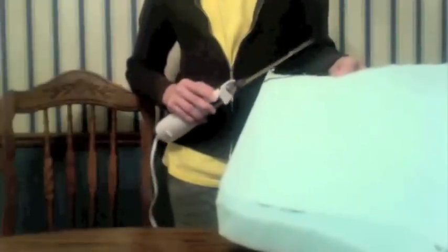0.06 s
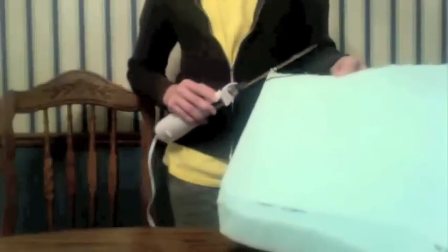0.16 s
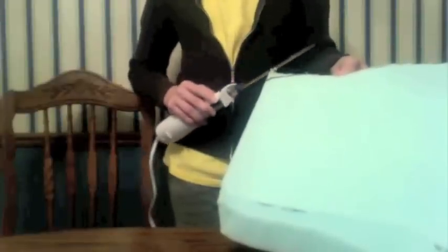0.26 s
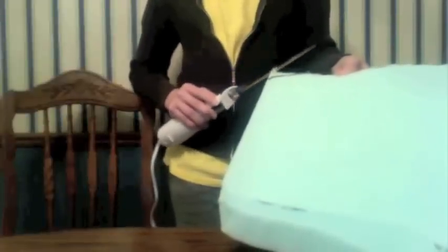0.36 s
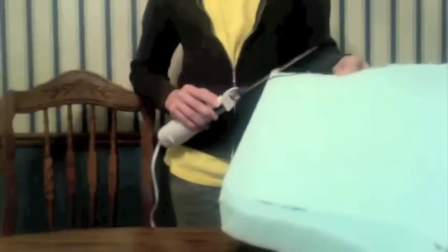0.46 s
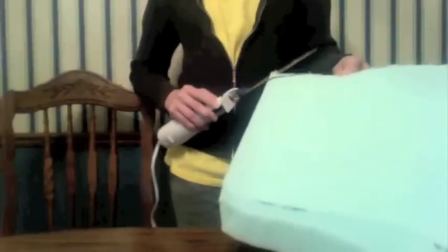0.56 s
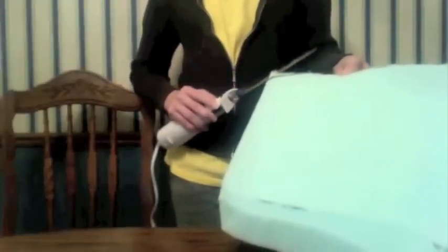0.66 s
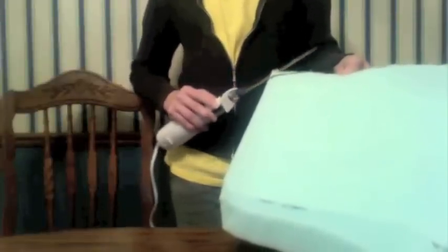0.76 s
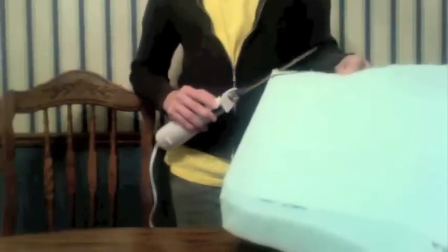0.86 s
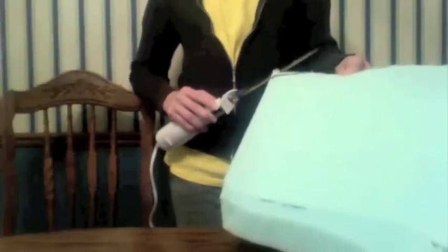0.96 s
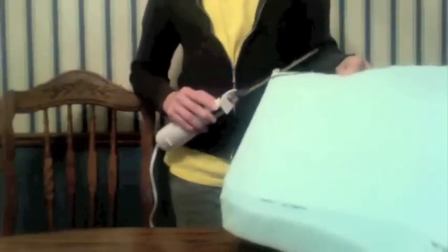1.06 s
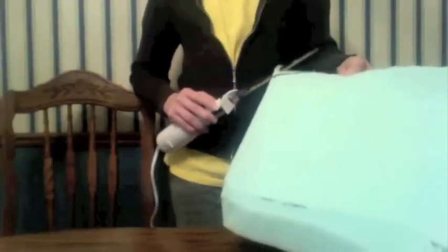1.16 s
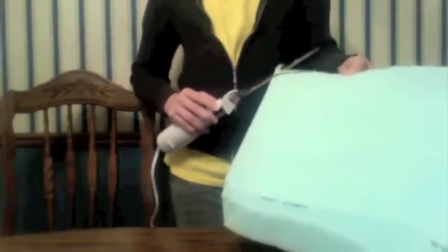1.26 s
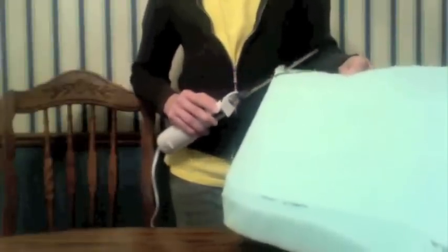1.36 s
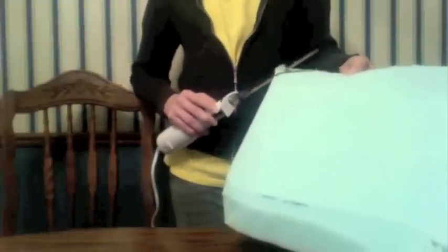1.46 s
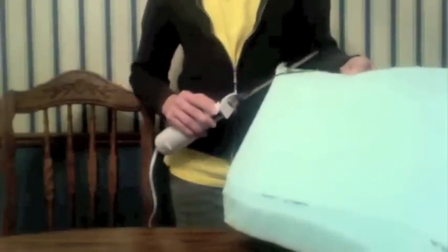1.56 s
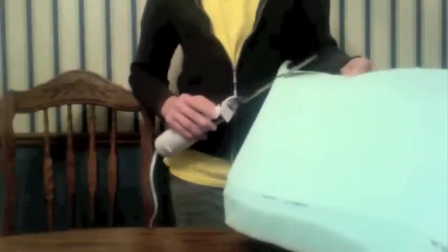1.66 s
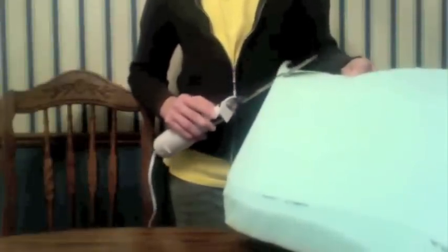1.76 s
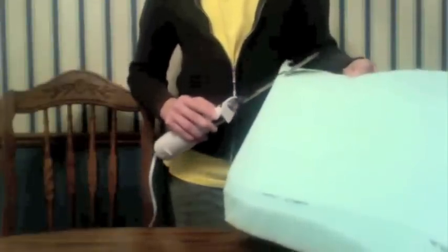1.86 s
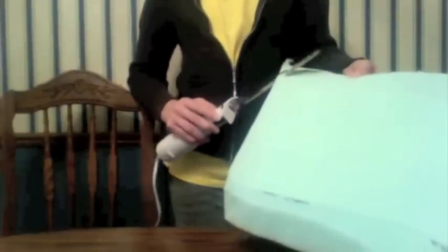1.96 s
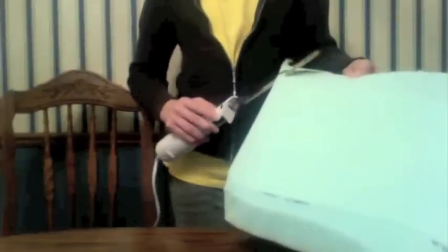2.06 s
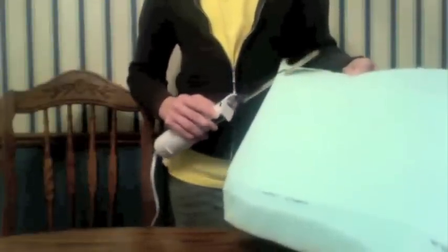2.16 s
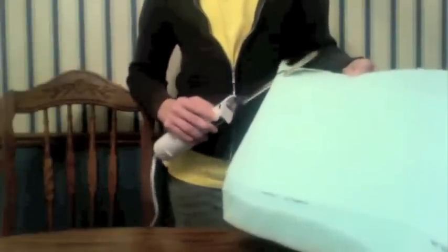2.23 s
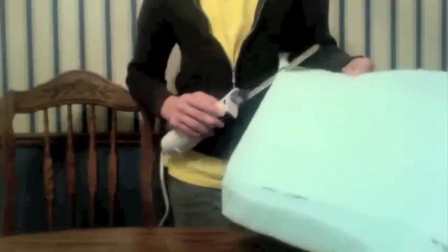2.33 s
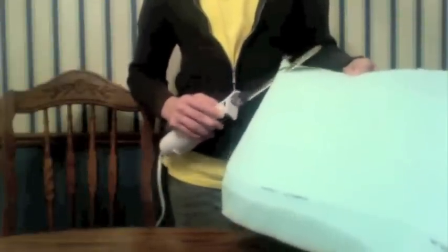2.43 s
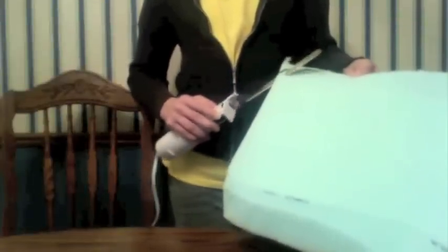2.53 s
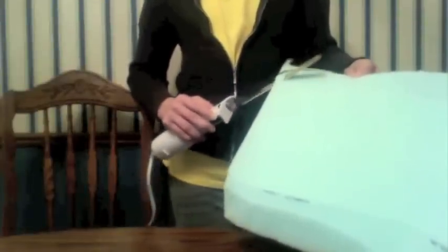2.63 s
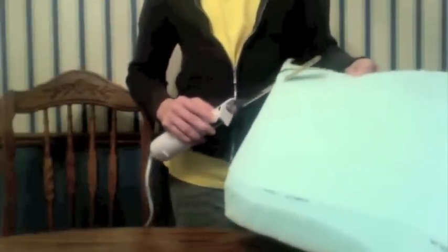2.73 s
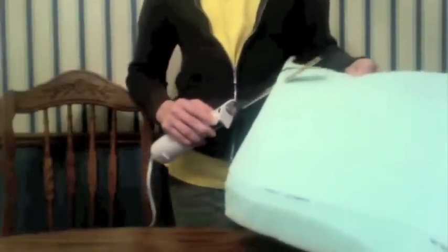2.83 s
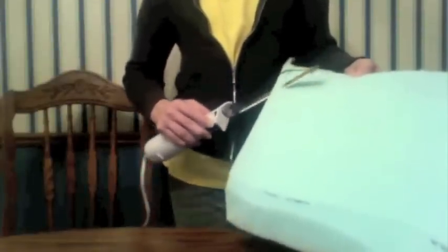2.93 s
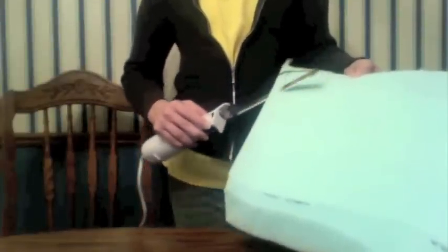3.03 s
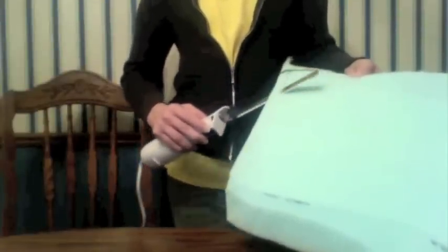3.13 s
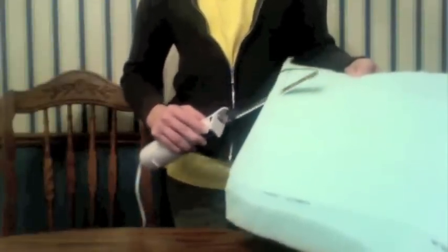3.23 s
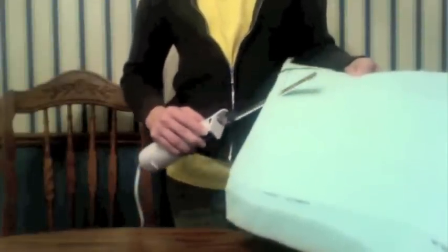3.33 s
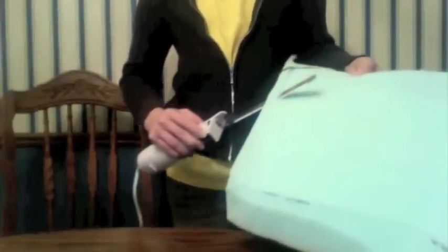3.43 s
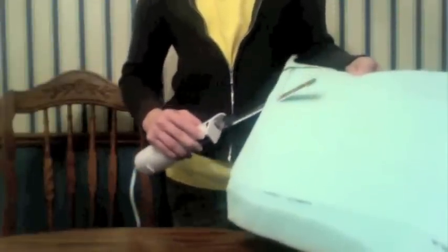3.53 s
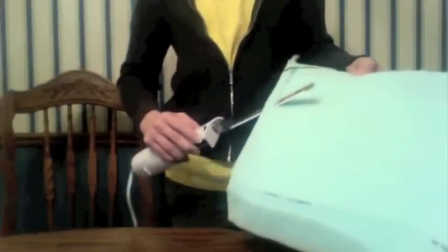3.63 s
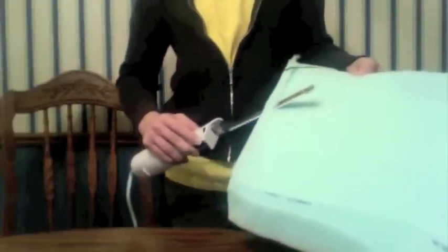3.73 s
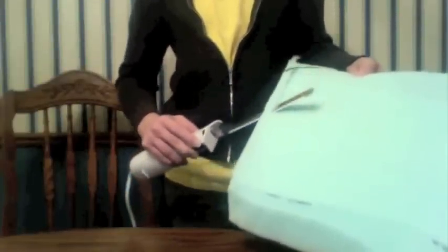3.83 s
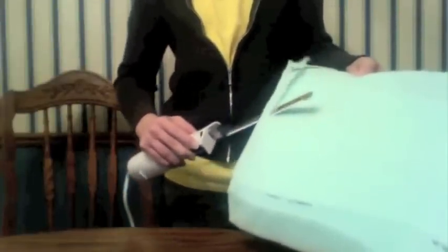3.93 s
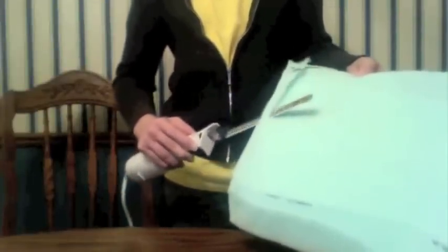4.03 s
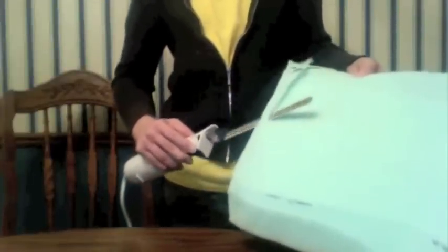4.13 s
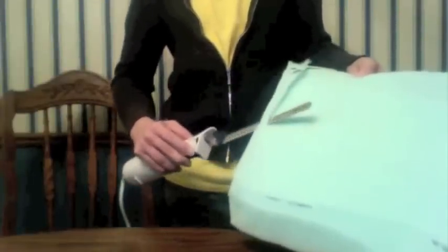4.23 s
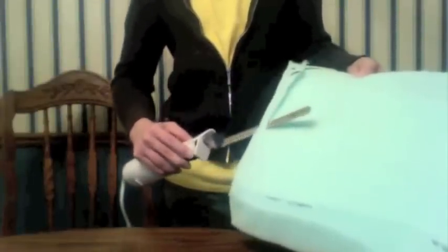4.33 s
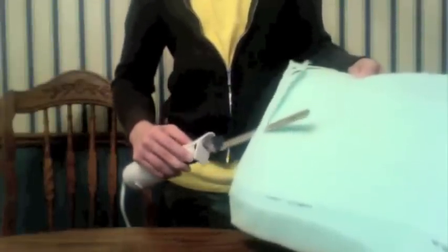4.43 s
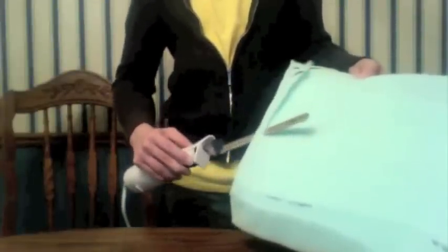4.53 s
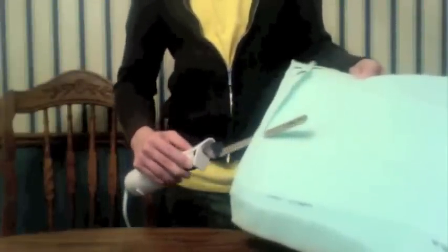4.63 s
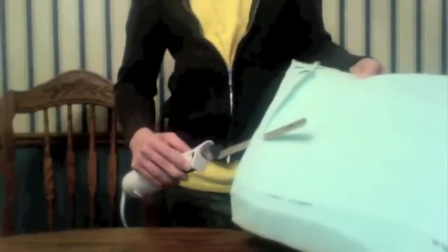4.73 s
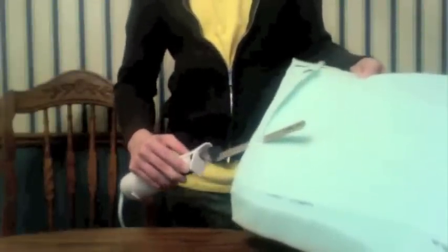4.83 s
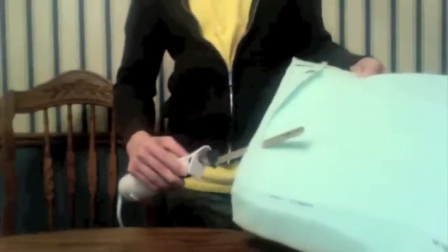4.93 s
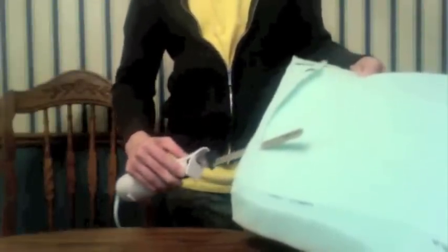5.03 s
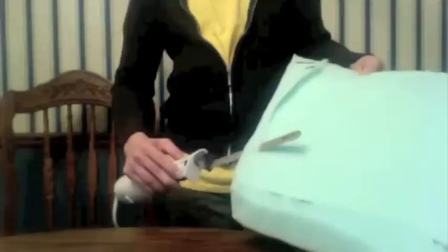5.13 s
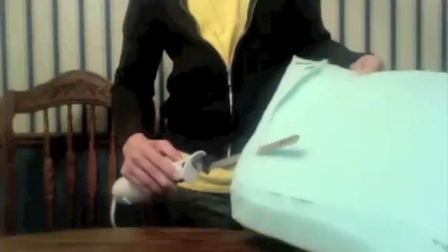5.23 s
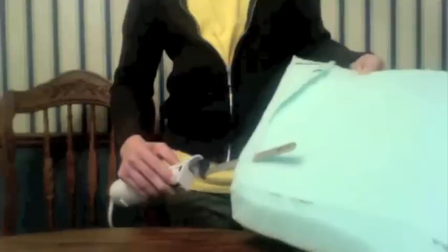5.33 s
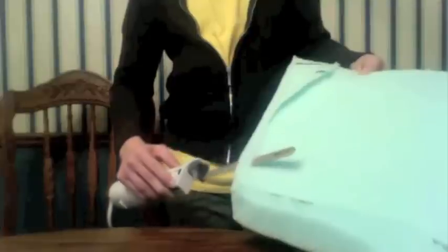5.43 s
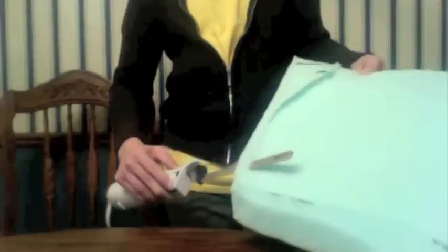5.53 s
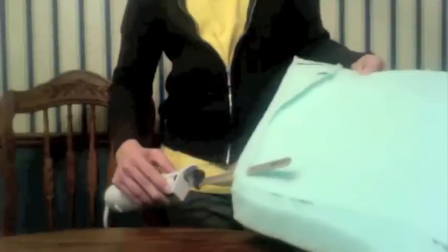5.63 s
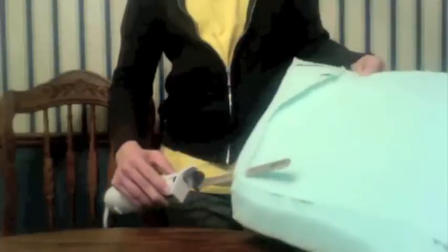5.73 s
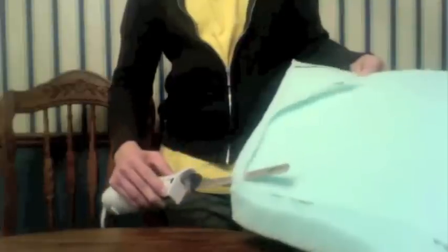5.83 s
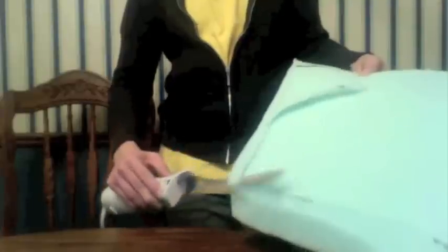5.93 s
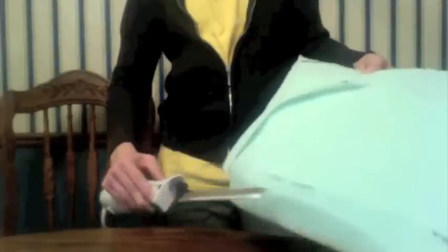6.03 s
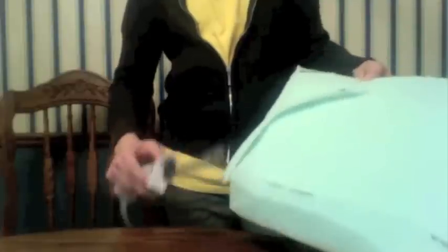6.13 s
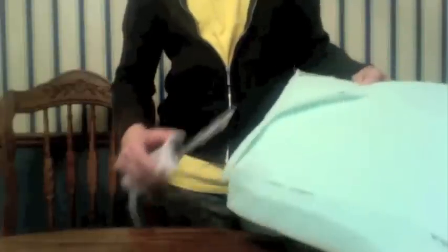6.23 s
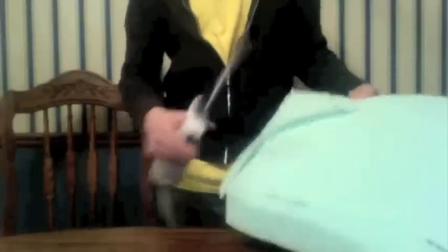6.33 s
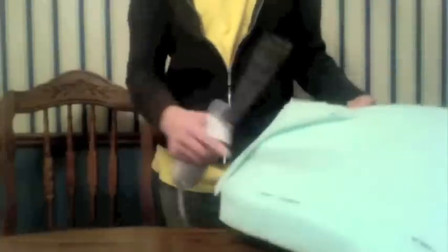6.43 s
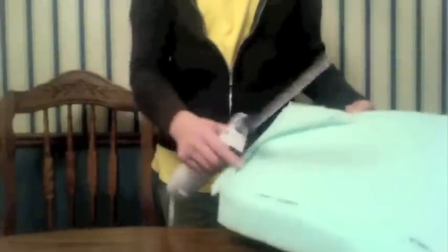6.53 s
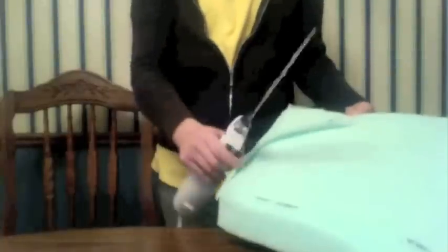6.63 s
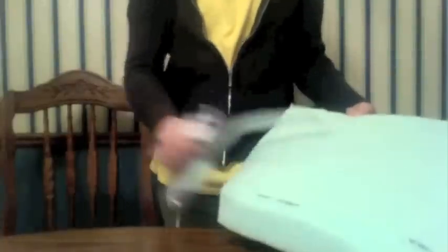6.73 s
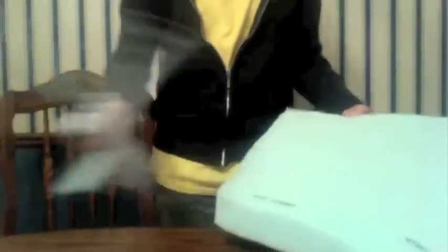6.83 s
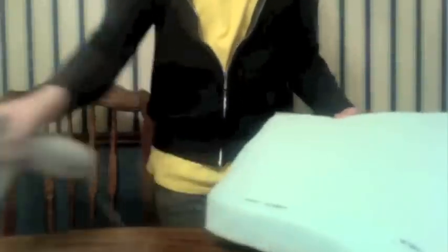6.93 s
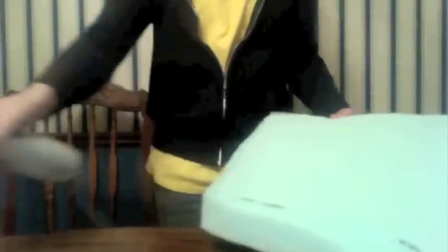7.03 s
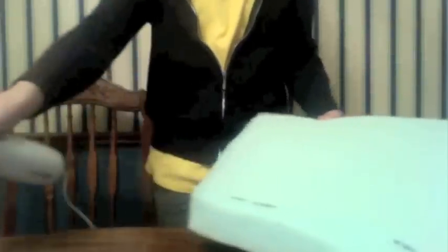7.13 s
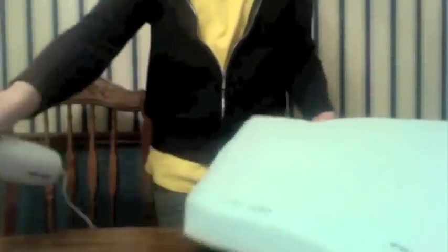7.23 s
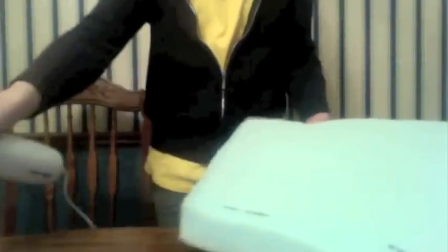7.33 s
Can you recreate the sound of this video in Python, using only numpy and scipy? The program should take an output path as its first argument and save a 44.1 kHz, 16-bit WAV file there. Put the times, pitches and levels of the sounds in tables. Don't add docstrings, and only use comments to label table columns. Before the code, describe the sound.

An electric carving knife whirs up into a harsh, loud buzz, sawing foam with small pitch dips, then coasts down and stops in a quiet room.

```python
import sys
import numpy as np
from scipy import signal
from scipy.fft import rfft, irfft, next_fast_len
from scipy.io import wavfile
from scipy.ndimage import uniform_filter1d, map_coordinates

SR = 44100
rng = np.random.default_rng(int(sys.argv[2]) if len(sys.argv) > 2 else 0)


def transcribe(u):
    v = np.clip(np.atleast_2d(u).T, -1, 1)
    q = np.round(v * 32767).astype(np.int16)
    wavfile.write(sys.argv[1], SR, q)


def rack_gain(trim_db):
    fader = np.asarray(trim_db, float)
    return 10 ** (fader / 20)


N = 325744
SIZE = next_fast_len(N)
TIME = np.arange(N) / SR
FULL_SPEED = 83
MAINS_HZ = 60


def rms_one(x):
    return x / np.sqrt(np.mean(x ** 2) + 1e-20)


def in_time(rows):
    s, *columns = np.transpose(rows)
    return [np.interp(TIME, s, column) for column in columns]


def at_hz(points):
    hz = np.maximum(np.fft.rfftfreq(SIZE, 1 / SR), 1)
    table_hz, value = np.array(points)[:, 0], np.array(points)[:, 1]
    return np.interp(np.log(hz), np.log(table_hz), value)


def shaped(x, gain):
    return irfft(rfft(x, SIZE) * gain, SIZE)[:N]


def noise():
    return rng.standard_normal(N)


def low_noise(cutoff_hz):
    return rms_one(signal.sosfilt(signal.butter(2, cutoff_hz, fs=SR, output="sos"), noise()))


def drift(rate):
    coarse = np.arange(0, N + 32, 32)
    smooth = map_coordinates(rng.standard_normal(500), [coarse / SR * rate + 2], order=3)
    return np.interp(np.arange(N), coarse, smooth)


# (from [s], to [s], coasting time constant [s])
TRIGGER_OFF = [
    (3.624, 3.778, .45),
    (4.792, 4.943, .45),
    (6.04, 8, .6),
]
# (time [s], speed [turns per s])
LOADED_SPEED = [(0, 83.4), (1.6, 83.4), (2.0, 82.1), (2.34, 82.8), (3.15, 82.1), (4.8, 82.3), (5.0, 83),
                (5.7, 83.8), (6.04, 84.6)]


def speed():
    start_speed, spin_up_s = 62.5, .138
    goal, = in_time(LOADED_SPEED)
    out = goal - (goal[0] - start_speed) * np.exp(-TIME / spin_up_s)
    for start, end, coast_s in TRIGGER_OFF:
        at_release = out[round(start * SR)]
        out = np.where(TIME > start, at_release * np.exp((start - TIME) / coast_s), out)
        short = np.interp(end, TIME, goal - out)
        recovered = goal - short * np.exp(np.minimum(end - TIME, 0) / spin_up_s)
        out = np.where(TIME > end, recovered, out)
    return out


def slowness():
    return np.clip(1 - speed() / FULL_SPEED, 0, 1)


def driven():
    slack_s = .02
    on = np.ones(N)
    for start, end, _ in TRIGGER_OFF:
        on[(TIME > start + slack_s) & (TIME < end)] = .05
    return uniform_filter1d(on, size=900)


def slowed_db():
    bite_s, powered_share, head_start_s = 0.23, 0.36, 0.018
    since = TIME + head_start_s
    for start, end, _ in TRIGGER_OFF:
        since = np.where(TIME > start, np.maximum(TIME - end, 0), since)
    won_back = powered_share * (1 - np.exp(-since / bite_s))
    return 20 * np.log10(speed() / FULL_SPEED) * (1 - won_back)


# (time [s], push [dB], blades free of the foam [0-1], vents facing the microphone [0-1])
CUT = [(0, 6.5, 0.54, 0.9), (.35, 3.5, 1, 1.18), (1.25, 3.5, 1, 0.9), (1.55, 3.5, 0.96, 0.84),
       (1.72, 4, 0.69, 0.07), (2.03, 4, 0.39, 0.07), (2.15, 6, 0.37, 0), (2.41, 1.5, 0.55, 0.5),
       (2.47, -1, .7, 0.63), (3.6, -4, 0.41, 0.64), (4.0, 1.5, 0.32, 0.56), (4.8, -1, 0.2, 0.5),
       (5.1, 2.5, 0, 0.35), (5.5, 1.5, 0, 0.43), (5.92, 0, 0, 0.3), (6.06, 1.5, 0.15, 0.9),
       (6.18, 4.5, -.1, 0.4), (6.45, -3.5, 0.05, .9)]
# (time [s], width [s], housing [dB], blades [dB], gears [dB])
SNAGS = [(1.04, 0.086, -3, -1.5, 0.4), (1.35, 0.044, -2.5, -3, -0.2), (1.43, 0.016, -7, 1, 1.3),
         (1.85, 0.074, -5, .1, -0.5), (1.9, 0.022, -4.5, 4, 2.3), (2.0, 0.053, 1.5, 3, -0.5),
         (2.1, 0.023, -6, -1, -2.5), (2.175, 0.027, 5, 5, -2.7), (2.255, 0.028, -2, 0, -4),
         (2.32, 0.04, 3, 2, -0.5), (2.39, 0.038, 2, 6, -4), (2.63, 0.038, 1.5, 0.5, 0.5),
         (3.0, .15, -1.3, 0.5, 0), (3.91, 0.035, 3.5, 0.5, 1.5), (4.2, 0.074, 0, 0, -0.5),
         (4.83, 0.015, 4.5, -6.5, 2.5), (5.3, .08, 1.5, 0.5, -0.5), (6.02, .06, 0.5, 0, .1),
         (6.15, 0.077, -0.5, 1, 1), (6.48, .08, 1, -2.8, 2.5)]
# (level [dB], share of push [ratio], when free [dB], vents facing [dB], speed [power])
ANSWER = [
    (-37.5, .7, -3.5, 5.5, 2.6),
    (-29, 1.04, 7.5, 1, 2.9),
    (-25.5, 0.86, 8, 0, 2.36),
    (-21, 0.92, -1, 0.5, 3.42),
    (-29, 1.01, 0, 9.5, 3.1),
]


def region_db():
    push_db, free, vents = in_time(CUT)
    slowed = slowed_db()

    def snag_db(column):
        return sum(row[column] * np.exp(-((TIME - row[0]) / row[1]) ** 2) for row in SNAGS)

    housing, blade, gear = snag_db(2), snag_db(3), snag_db(4)
    snags = [0, housing, blade, gear, .03 * (housing + blade)]
    return [db + share * push_db + free_db * free + vent_db * vents + power * slowed + snag
            for (db, share, free_db, vent_db, power), snag in zip(ANSWER, snags)]


# (frequency [Hz], share [0-1])
REPEATING = [(60, 0.3), (200, 0), (420, .6), (700, 0.6), (1500, 0.64), (3300, 0.41), (5000, .25), (7000, 0),
             (15000, 0.3)]


def contacts(turns, memory, throb):
    pattern = signal.lfilter([1], [1, -memory], rng.standard_normal((700, 512)), axis=0)[100:]
    pattern = np.hstack([pattern, pattern[:, :1]])
    repeated = rms_one(map_coordinates(pattern, [turns, turns % 1 * 512], order=1))
    beat = 1 + throb * np.cos(4 * np.pi * turns) + 0.35 * throb * np.cos(8 * np.pi * turns + 1)
    locked = driven() * rack_gain(-.6 * np.clip(region_db()[1] + 26, 0, 12))
    locked = locked * np.clip(speed() / 82, 0, 1) ** 6
    loose = np.sqrt(1 - locked ** 2) * noise()
    share = np.clip(at_hz(REPEATING), 0, 1)
    periodic = shaped(locked * repeated + loose, np.sqrt(share))
    scraping = shaped(beat * noise(), np.sqrt(1 - share))
    return periodic + scraping


# (centre [Hz], width [Hz], gain [dB])
MODES_HZ = [(1338, 68, 3.5), (1463, 34, 10), (1567, 43, 3.5), (2107, 7.7, 7), (3002, 25, 7), (3278, 19, 9),
            (4254, 29, 8), (4936, 35, 7), (5800, 56, 7.5), (6240, 71, 5), (12600, 900, -9)]


def resonances():
    hz = np.fft.rfftfreq(SIZE, 1 / SR)
    return rack_gain(sum(db / (1 + (2 * (hz - centre_hz) / width) ** 2) for centre_hz, width, db in MODES_HZ))


EDGES_HZ = [1000, 2300, 4400, 8500]
# (frequency [Hz], level [dB per Hz])
BUZZ_COLOUR = [(25, -53), (100, -46.5), (200, -25.5), (300, -19.5), (500, -8.5), (760, -7), (1000, -8.5),
               (1200, 1), (1400, 2.5), (1620, 5), (1800, -3), (2150, -5), (2450, -11.5),
               (2800, -3.5), (3300, -3), (3800, -4.5), (4600, -6), (5300, -2), (6400, -1.5), (7200, -7.5),
               (8100, -9.5), (8450, -17.5), (8950, -8.5), (10500, -10.5), (12900, -7.5), (14300, -10),
               (15800, -21.5)]


def buzz(turns, flutter_db):
    force = rfft(contacts(turns, memory=0.894, throb=0.098), SIZE)
    force = force * rack_gain(at_hz(BUZZ_COLOUR)) * resonances()
    octave = np.log2(np.fft.rfftfreq(SIZE, 1 / SR) + 1)
    above = [1] + [1 / (1 + np.exp(-12 * (octave - np.log2(hz)))) for hz in EDGES_HZ] + [0]
    grip = drift(9.0) + 0.52 * drift(25.0)
    flutter_db = flutter_db * (1 + 1.2 * (1 - driven()))
    out = 0
    for k, level_db in enumerate(region_db()):
        region = rms_one(irfft(force * np.sqrt(above[k] - above[k + 1]), SIZE)[:N])
        out = out + rack_gain(level_db + flutter_db * (grip + 0.66 * drift(18.0))) * region
    return out


ORDER_DB = {"1": (-84.5, 4), "2": (-62, 2), "3": (-60, 7.5), "4": (-63.5, 3.5), "5": (-49.5, 2),
            "10": (-44.5, 0), "15": (-43.5, 9), "40": (-41, 5), "80": (-27, 8), "120": (-42, 7),
            "ripple": (-14.5, -2.5)}
# (order, from [s], to [s], change [dB])
GRIP = [("1", 2.9, 3.65, 9), ("1", 4.1, 4.8, 15), ("1", 5.1, 6.0, 14), ("2", 0, .9, -12),
        ("2", 5.12, 5.5, -14), ("3", .95, 2.1, 11), ("3", 3.3, 4.45, 11), ("3", 5.05, 5.95, 13),
        ("4", 2.6, 6.0, 14), ("10", 1.74, 2.1, 3), ("5", .9, 1.5, 7), ("5", 1.6, 2.3, -8),
        ("5", 3.1, 3.7, -19), ("10", 0, .55, 9), ("10", 1.74, 3.64, 10), ("10", 4.26, 4.83, 12.5),
        ("10", 5.24, 5.46, 10.5), ("10", 5.6, 6.06, 7), ("15", .58, 1.29, 21), ("15", 1.42, 1.65, 19),
        ("40", 1.8, 2.45, 15), ("40", 2.5, 2.7, 13), ("40", 5.1, 5.8, 8), ("80", 4.9, 5.07, -6),
        ("80", 4.1, 4.5, 4), ("80", 5.8, 6.1, -7), ("120", .38, 1.7, 16), ("120", 4.15, 4.75, 6),
        ("ripple", 1.55, 2.12, 13), ("ripple", 4.0, 5.4, 5)]


def order_db():
    edge_s = .03
    t = np.arange(0, N + 32, 32) / SR
    slowed = slowed_db()
    held = {order: np.full(len(t), float(db)) for order, (db, _) in ORDER_DB.items()}
    for order, start, end, db in GRIP:
        window = (np.tanh((t - start) / edge_s) - np.tanh((t - end) / edge_s)) / 2
        held[order] = held[order] + db * window
    return [np.interp(TIME, t, held[order]) + power * slowed for order, (_, power) in ORDER_DB.items()]


def low_orders(turns, low, tooth):
    clear_s, clear_db_per_s, wander_db = 6.0, 90, 1.2
    clear_db = clear_db_per_s * np.maximum(TIME - clear_s, 0)
    torque_db = 20 * np.log10(driven())
    levels = [db - clear_db + wander_db * drift(1.9) for db in low]
    levels += [db + torque_db + wander_db * drift(4.3) for db in tooth]
    out = 0
    for order, level_db in zip((1, 2, 3, 4, 5, 10, 15), levels):
        out = out + rack_gain(level_db + 1.37 + 0.7 * drift(10.0)) * np.sin(2 * np.pi * order * turns)
    return out


def commutator(wobble, slow, ripple_db):
    ripple = 2 * np.pi * 4 * MAINS_HZ * TIME
    carrier = 2 * np.pi * 80 * wobble
    surge = rack_gain(55 * np.minimum(slow, .2) + 14.0 * np.exp(-TIME / .18))
    tone = rack_gain(0.1 - 8.8 * np.exp(-TIME / 0.27) + 3.3 * drift(25.0))
    skirt = rack_gain(-5.5 + 9.1 * np.minimum(slow, .2) + 4.3 * np.exp(-TIME / .2)) * low_noise(450)
    out = (tone + skirt) * np.sin(carrier)
    out = out + rack_gain(ripple_db + 3.0 * drift(12.0)) * np.sin(carrier - ripple)
    out = out + rack_gain(-22.5 + 3.5 * drift(13.0)) * np.sin(carrier + ripple)
    return surge * out


# (order, level re whine [dB])
WHINE_ORDERS = [(60, -10), (160, -16.5)]


def whine(turns):
    *low, tenth_db, fifteenth_db, fortieth_db, whine_db, upper_db, ripple_db = order_db()
    whine_db = whine_db + .9 * in_time(CUT)[0] + 1.0 * drift(7.0)
    fortieth_db = fortieth_db + 2.1 * drift(7.5)
    slow = slowness()
    wobble = turns + .0006 * drift(30.0) + 0.028 * slow * drift(55.0)
    high = rack_gain(upper_db - whine_db - 1.5 + 2.2 * drift(12.0)) * np.sin(2 * np.pi * 120 * wobble)
    for order, rel_db in WHINE_ORDERS:
        high = high + rack_gain(rel_db - 490 * slow + 1.3 * drift(6.0)) * np.sin(2 * np.pi * order * wobble)
    high = high + commutator(wobble, slow, ripple_db)
    blade_ring = rack_gain(2.5) + 1.2 * low_noise(90)
    fortieth = rack_gain(fortieth_db - 90 * slow) * blade_ring * np.sin(2 * np.pi * 40 * wobble)
    out = low_orders(turns, low, (tenth_db, fifteenth_db))
    return np.sqrt(2) * (out + driven() * (fortieth + rack_gain(whine_db) * high))


def knife():
    stall_s, stall_db_per_s = 6.524, 126.5
    turns = np.cumsum(speed()) / SR
    running = np.interp(TIME, [6.62, 6.72], [1, 0])
    running = running * rack_gain(-stall_db_per_s * np.maximum(TIME - stall_s, 0))
    coasting = slowness() * (1 - driven())
    running = running * rack_gain(coasting * (4.2 * np.cos(2 * np.pi * turns) + 3.3 * drift(40.0)))
    return running * (buzz(turns, flutter_db=0.4066) + whine(turns))


# (time [s], level [dB])
RUSTLE = [
    (6.988, -81),
    (6.995, -54),
    (7.005, -55),
    (7.013, -63),
    (7.022, -85),
]
# (frequency [Hz], level [dB per Hz])
RUSTLE_COLOUR = [(530, -48.5), (900, -12.5), (2150, -3), (3980, -11.5), (4380, -1), (4860, -9),
                 (9500, -18.5), (11000, -36), (14300, -64), (22000, -120)]


def rustle():
    s, level_db = np.transpose(RUSTLE)
    gain = rack_gain(np.interp(TIME, s, level_db, left=-140, right=-140))
    return gain * rms_one(shaped(noise(), rack_gain(at_hz(RUSTLE_COLOUR))))


# (time [s], length [s], upper tone [dB])
CRICKET = [(6.694, 0.0066, -68), (6.724, 0, -69), (6.789, 0, -72), (6.812, 0.089, -60), (6.941, .036, -67),
           (7.046, 0.013, -75), (7.11, .018, -69), (7.179, .018, -68), (7.243, 0.028, -65),
           (7.345, .018, -60)]


def cricket():
    pulse_s, ends_db_per_s = .0181, 190
    pulses = []
    for s, length, db in CRICKET:
        for lag in pulse_s * np.arange(round(length / pulse_s) + 1):
            pulses.append((s + lag, db - ends_db_per_s * abs(lag - length / 2)))
    out = np.zeros(N)
    t = np.arange(int(.008 * SR)) / SR
    chance = rng.standard_normal((40, 2))
    for (s, upper_db), (bend, uneven) in zip(pulses, chance):
        phase = 2 * np.pi * 4620 * (1 + .01 * bend) * t
        lower_db = (-63 if s > 7.02 else -80) + 3 * uneven
        pulse = rack_gain(upper_db + 1.5 * uneven) * np.sin(2 * phase) + rack_gain(lower_db) * np.sin(phase)
        at = round(s * SR)
        out[at:at + len(t)] += (np.hanning(len(t)) * pulse)[:N - at]
    return out


# (time [s], level [dB])
ROOM = [(0, -52.5), (6.75, -62.5), (6.93, -57.5), (6.985, -64), (7.02, -95), (7.39, -96)]
# (frequency [Hz], level [dB per Hz])
ROOM_COLOUR = [(30, -63.5), (150, -28.5), (360, -21.5), (470, -9), (520, -22), (700, -15.5), (1000, -26.5),
               (2050, -28.5), (2500, -32.5), (6900, -37.5), (8300, -45), (9200, -38.5), (10200, -43),
               (15700, -47)]
# (mains multiple, level [dB])
HUM = [(2, -81), (7, -73), (8, -73), (35, -75.5)]
# (time [s], level [dB])
ROOM_AFTER = [(0, -97.5), (7.015, -88.5), (7.04, -64), (7.08, -54), (7.15, -54.5), (7.22, -56.5),
              (7.3, -56), (7.39, -53.5)]
# (frequency [Hz], level [dB per Hz])
AFTER_COLOUR = [(25, -33.5), (45, -22.5), (140, -19), (240, -7.5), (360, -12.5), (450, -18.5), (1060, -22),
                (1600, -28.5), (3660, -33), (4250, -41), (5000, -35.5), (8700, -42.5), (9800, -45.5),
                (15700, -62)]
# (mains multiple, level [dB])
HUM_AFTER = [(1, -78.5), (4, -58), (6, -65.5), (10, -71.5)]
# (time [s], level [dB])
SETTLING = [(0, -96.5), (7.02, -91.5), (7.045, -55), (7.1, -59), (7.17, -60), (7.25, -71), (7.39, -73)]
# (frequency [Hz], level [dB per Hz])
SETTLING_COLOUR = [(350, -40.5), (750, -5.5), (1020, -14), (1400, -11.5), (2000, -10.5), (2200, -4),
                   (2430, -19), (3650, -18.5), (4050, -35.5), (6000, -50), (10000, -91.5)]


def room_tone(curve, colour, hum):
    level_db, = in_time(curve)
    air = rack_gain(level_db + 1.2 * drift(19.0)) * rms_one(shaped(noise(), rack_gain(at_hz(colour))))
    phase = 2 * np.pi * MAINS_HZ * TIME
    lines = sum(rack_gain(db + 2.2 * drift(14.0)) * np.sin(k * phase) for k, db in hum)
    return air + lines * rack_gain(np.minimum(level_db - level_db.max() + 9.5, 0))


def scene():
    room = room_tone(ROOM, ROOM_COLOUR, HUM) + room_tone(ROOM_AFTER, AFTER_COLOUR, HUM_AFTER)
    settling = room_tone(SETTLING, SETTLING_COLOUR, [])
    return np.tile(knife() + rustle() + cricket() + room + settling, (2, 1))


def band_limit(x):
    return signal.sosfilt(signal.butter(12, 15820, fs=SR, output="sos"), x)


def record(dry):
    top = .89
    loud = dry / (1 + np.abs(dry / top) ** 8) ** (1 / 8)
    mix = signal.sosfilt(signal.butter(1, 60, "high", fs=SR, output="sos"), loud)
    return band_limit(mix)


dry = scene()
out = record(dry)
transcribe(out)
```